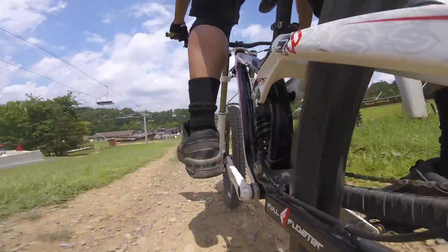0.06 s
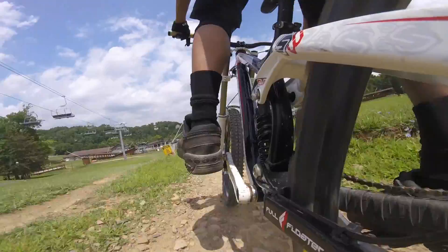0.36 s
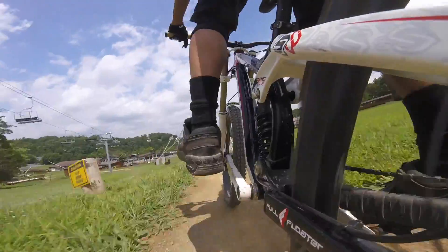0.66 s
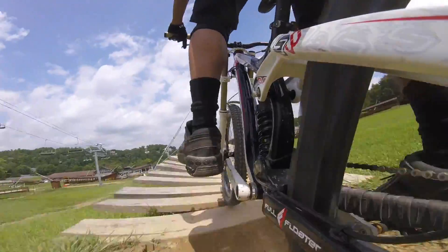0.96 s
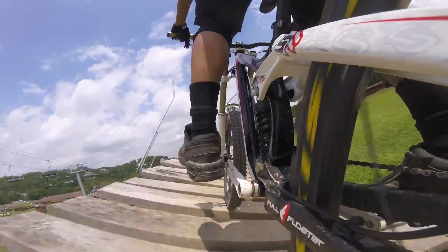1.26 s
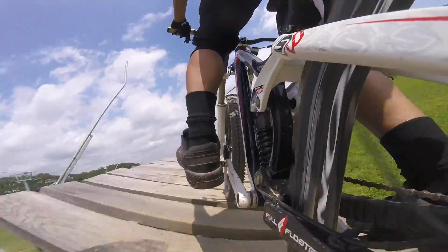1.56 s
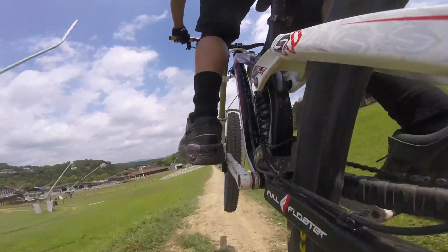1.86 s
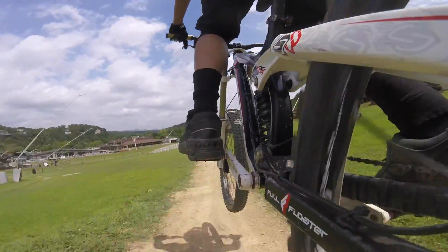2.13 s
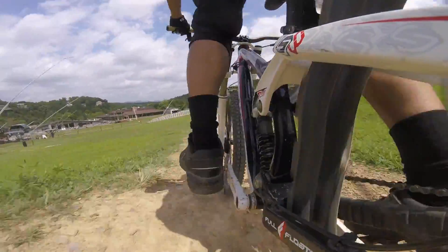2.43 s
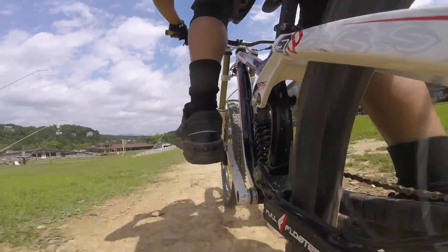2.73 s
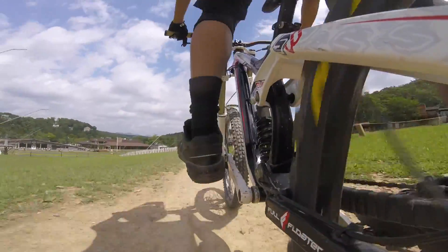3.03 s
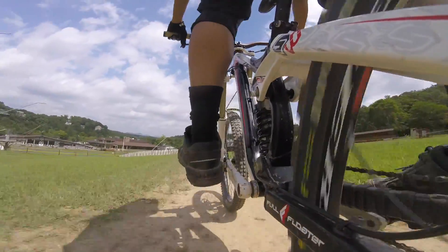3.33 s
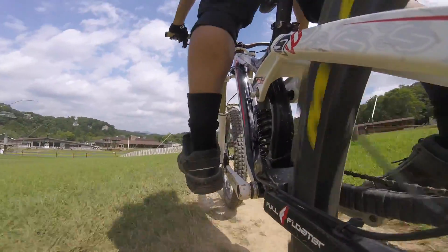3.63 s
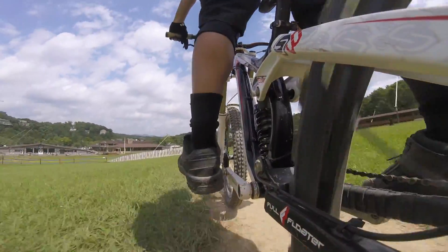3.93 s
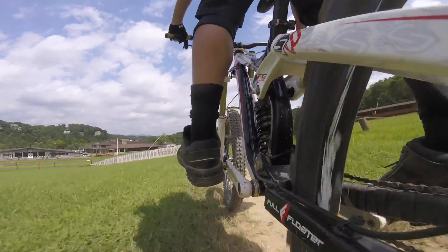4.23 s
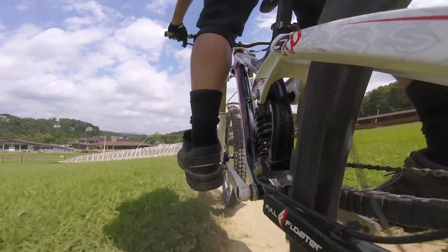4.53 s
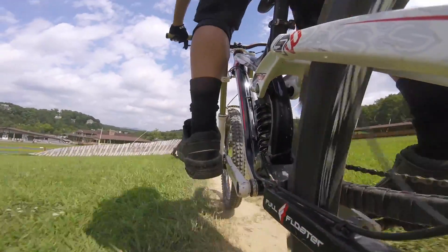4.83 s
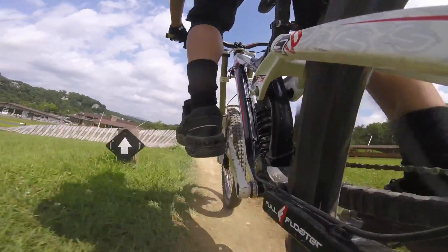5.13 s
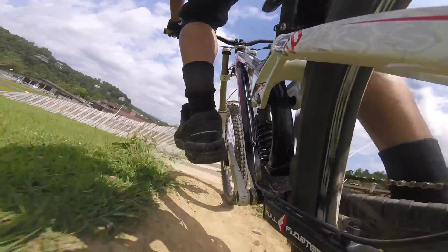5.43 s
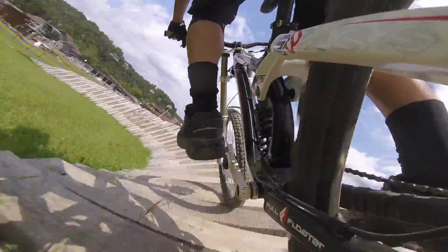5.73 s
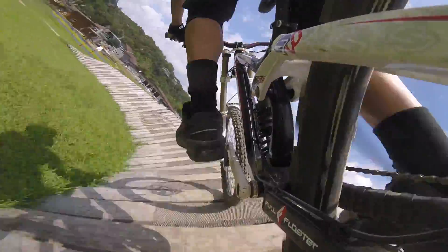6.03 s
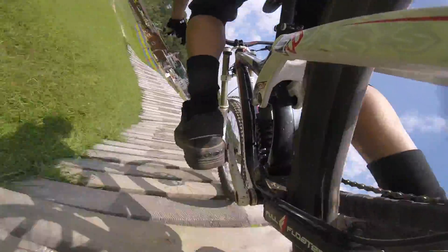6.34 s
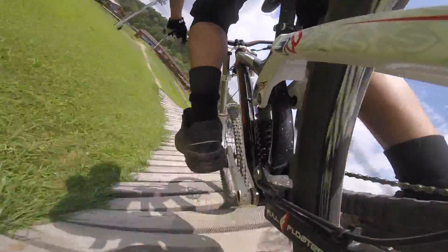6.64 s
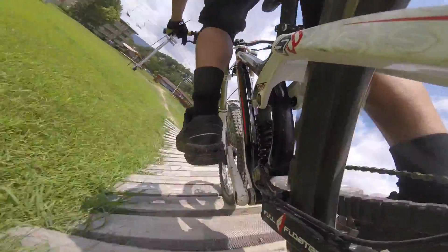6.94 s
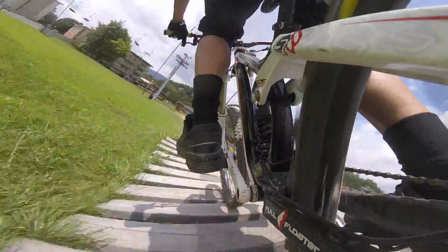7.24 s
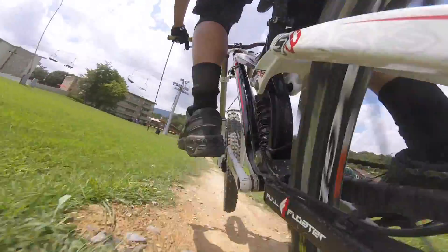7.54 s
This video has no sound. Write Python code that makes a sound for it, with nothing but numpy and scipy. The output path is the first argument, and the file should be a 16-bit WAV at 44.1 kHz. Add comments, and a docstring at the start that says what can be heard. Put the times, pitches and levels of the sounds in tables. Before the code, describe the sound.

A mountain bike coasts downhill, hub buzzing and chain slapping over dirt, lands a jump, then drums across wooden planks in wind.

```python
"""Mountain bike coasting downhill

Heard from a camera clamped to the frame. The freehub buzzes, tyres scrub and crunch on dirt,
and bumps boom the frame and set the chain slapping. The tyres go quiet in a short jump and land
with a thud. Later wind buffets the microphone and wooden planks drum under the wheels."""
import sys
import numpy as np
from scipy import signal
from scipy.fft import rfft, irfft
from scipy.io import wavfile
from scipy.ndimage import uniform_filter1d

SR = 44100
rng = np.random.default_rng(int(sys.argv[2]) if len(sys.argv) > 2 else 0)


def store_wav(level_fs):
    """Save 16-bit WAV to argv[1]."""
    pcm = np.round(np.clip(np.atleast_2d(level_fs), -1, 1) * 32767)
    wavfile.write(sys.argv[1], SR, pcm.T.astype(np.int16))


N = 343539
T = np.arange(N) / SR

LIFT_S, FRONT_DOWN_S, REAR_DOWN_S = 1.706, 2.13, 2.42  # the jump

# Ratchet rate while coasting: time_s, teeth_per_s
RATCHET_RATE = [(0, 108), (.35, 116), (.9, 110), (1.15, 88), (1.95, 89), (2.15, 100), (2.38, 89), (2.9, 98),
                (3.55, 92), (3.75, 103), (4.2, 109), (6.6, 105), (7.1, 94), (7.79, 92)]
# Freehub levels: time_s, click_db, shell_db
HUB_LEVELS = [(0, -58.5, -57), (.63, -53.5, -54.5), (1, -56, -56.5), (1.85, -55.5, -55), (2.3, -52, -52.5),
              (2.85, -56.5, -54), (3.3, -58.5, -60), (3.6, -55, -55), (4.2, -51, -53), (4.55, -56.5, -56.5),
              (4.8, -57.5, -80), (6, -75, -84), (6.45, -65, -75), (6.9, -62, -59), (7.79, -61, -59)]
# Ground contact: time_s, roar_db, grit_db
TYRE_LEVELS = [(0, -34, -44.5), (.4, -32, -43.5), (.8, -33.5, -48.5), (1.19, -33.5, -41.5),
               (1.38, -39.5, -49.5), (1.65, -35, -44), (2.15, -35.5, -50), (2.31, -29, -43),
               (2.395, -35, -43.5), (2.45, -32.5, -46), (2.55, -38.5, -44), (2.64, -30, -44.5),
               (2.95, -34, -48), (3.12, -33, -44.5), (3.4, -34, -44.5), (3.7, -30, -48),
               (3.97, -36.5, -45.5), (4.4, -34.5, -45), (6.55, -39.5, -48.5), (7.2, -36.5, -46.5),
               (7.45, -32.5, -43), (7.7, -35.5, -48), (7.765, -31, -43.5)]
# Rumble of sway and headwind: time_s, level_db
SWAY_LEVELS = [(0, -33), (.26, -24.5), (.55, -24), (.8, -35), (1.15, -23.5), (1.4, -33), (1.63, -18.5),
               (2.03, -48.5), (2.3, -28), (2.39, -36), (2.45, -23.5), (2.85, -28.5), (3.15, -25),
               (3.95, -32.5), (4.7, -25), (5.45, -22.5), (6.1, -24), (6.78, -30), (7.55, -22.5),
               (7.79, -31)]
# Hard chain slaps on the frame: start_s, rise_s, clash_db, knock_db, sparkle_db
SLAPS = [(0.156, 0.0044, -38.5, -42, -64.5), (0.237, 0.0019, -32, -27.5, -45.5),
         (0.295, 0.0051, -42, -28, -62), (0.3148, 0.0026, -28, -44, -59),
         (0.376, 0.0019, -33.5, -23.5, -43.5), (0.4259, 0.0035, -26, -26, -41.5),
         (0.486, 0.002, -29, -34, -46), (0.5164, 0.0012, -22.5, -28, -36),
         (0.6098, 0.0012, -22.5, -30, -51), (1.05, 0.0014, -28.5, -51, -60),
         (1.0976, 0.0014, -31, -38, -47), (1.123, 0.0012, -25.5, -48, -48.5),
         (1.1452, 0.0017, -28, -38, -41), (1.1563, 0.0019, -22, -19.5, -42),
         (1.1918, 0.00073, -17.5, -22, -34), (1.2207, 0.0023, -26, -29, -49),
         (1.2446, 0.0011, -24.5, -28, -40), (1.2589, 0.0024, -30, -26.5, -50),
         (1.379, 0.0028, -29.5, -32, -50), (1.4025, 0.001, -30, -26, -58), (1.493, 0.0013, -21, -23.5, -38),
         (1.5087, 0.0028, -27.5, -28, -43), (1.5428, 0.0011, -24, -24.5, -48),
         (1.5598, 0.0022, -24.5, -31, -40), (1.5893, 0.0013, -25.5, -30, -43),
         (1.607, 0.0017, -32, -35, -48), (1.644, 0.0013, -26.5, -31, -60), (1.6874, 0.0008, -33, -36, -49),
         (1.7, 0.0019, -24.5, -25, -60), (1.8054, 0.0017, -25.5, -29.5, -44.5),
         (2.4383, 0.0027, -22.5, -23, -41), (2.449, 0.0042, -29, -20.5, -52),
         (2.4584, 0.0013, -19, -21, -34), (2.4717, 0.005, -31, -29, -51), (2.4799, 0.0029, -23, -20, -41),
         (2.514, 0.0011, -26, -30, -47), (2.603, 0.0012, -28, -31, -51), (2.6211, 0.0014, -23.5, -34, -41),
         (2.6312, 0.0008, -42, -24, -60), (2.7421, 0.0011, -28.5, -24.5, -53),
         (2.756, 0.0025, -33, -32, -56), (2.7745, 0.0016, -20.5, -23.5, -41),
         (2.8959, 0.0025, -24, -24, -42), (2.9369, 0.0029, -28, -30, -45), (3.0379, 0.0013, -26, -30, -49),
         (3.0764, 0.0017, -23, -23, -53), (3.089, 0.0014, -20, -18.5, -50), (3.1103, 0.0023, -19, -16, -46),
         (3.1324, 0.003, -25, -24.5, -44), (3.1584, 0.0019, -27, -28, -49),
         (3.184, 0.0014, -29.5, -33, -55), (3.2338, 0.0012, -33, -32, -49),
         (3.4106, 0.0017, -29.5, -24, -60), (3.4332, 0.0028, -22.5, -28.5, -59),
         (3.596, 0.00078, -26.5, -28, -54), (3.6125, 0.0015, -28, -32, -58),
         (3.6484, 0.0041, -29.5, -23.5, -47), (3.6702, 0.0013, -21.5, -24.5, -54),
         (3.6935, 0.001, -21.5, -21.5, -51), (4.1284, 0.0015, -30, -36, -61),
         (4.2122, 0.0029, -22, -26, -47), (4.2391, 0.0018, -19.5, -17.5, -47),
         (4.287, 0.0021, -26, -32, -41), (4.428, 0.0007, -45, -38, -55), (4.6556, 0.0009, -36, -27.5, -46),
         (4.6784, 0.003, -37, -32, -56), (4.762, 0.0005, -38, -25.5, -69), (4.946, 0.0015, -33.5, -25, -45),
         (5.155, 0.0026, -34, -25, -59), (5.1774, 0.0024, -35, -42, -47), (5.1964, 0.0022, -35, -30, -53),
         (5.22, 0.0035, -34, -31, -52), (5.3108, 0.0022, -38, -28, -52), (5.324, 0.0009, -30.5, -34, -52),
         (5.3442, 0.0014, -29.5, -22, -49), (5.397, 0.0012, -37, -31, -50), (5.404, 0.0026, -35, -29, -48),
         (5.433, 0.0019, -34, -24, -51), (5.495, 0.0013, -35.5, -30, -48.5),
         (5.6274, 0.0024, -35.5, -34, -49), (5.7114, 0.0015, -29.5, -23.5, -45),
         (5.7433, 0.00062, -46, -26, -73), (5.8397, 0.0014, -34, -37, -50), (5.8672, 0.0013, -38, -27, -51),
         (5.886, 0.0022, -34.5, -34, -52), (5.9308, 0.0017, -30, -37, -57), (5.964, 0.0024, -38, -34, -53),
         (6.093, 0.0019, -31.5, -31, -52), (6.125, 0.0017, -34, -36, -47), (6.144, 0.0035, -38, -31, -54),
         (6.171, 0.0024, -35, -35, -50), (6.1918, 0.0008, -38, -40, -54), (6.2058, 0.0017, -37, -34, -51),
         (6.2374, 0.0026, -34.5, -28.5, -51), (6.3057, 0.0012, -37, -36, -57),
         (6.3295, 0.0017, -38, -41, -53), (6.3896, 0.0035, -39, -38, -65),
         (6.4344, 0.00099, -37.5, -47, -62), (6.4922, 0.0014, -37, -39, -58),
         (6.5236, 0.0019, -44, -45, -58), (6.541, 0.0015, -30, -32, -54),
         (6.5962, 0.0011, -28, -27.5, -42.5), (6.6144, 0.0009, -41, -37, -58),
         (6.6857, 0.0012, -36, -33, -67), (6.732, 0.0013, -35, -45, -53), (6.749, 0.002, -34, -31, -63),
         (6.857, 0.0017, -32, -24, -47), (6.8708, 0.0015, -31, -35, -47), (6.8916, 0.0015, -32, -40, -54),
         (6.9198, 0.0012, -34, -41, -49), (6.9324, 0.0014, -34, -40, -52), (6.948, 0.0012, -35, -35, -53),
         (6.9956, 0.0013, -38, -29.5, -51), (7.0227, 0.0011, -33, -32, -43),
         (7.0423, 0.0021, -35.5, -29, -50), (7.115, 0.0014, -28, -31.5, -48),
         (7.1369, 0.0012, -37, -41, -49), (7.2517, 0.0024, -38.5, -39, -58),
         (7.3648, 0.0011, -34, -35, -54), (7.386, 0.0013, -30.5, -34, -48), (7.465, 0.0014, -34, -39, -57),
         (7.4982, 0.0015, -27, -26, -59)]
# Trail bumps: start_s, length_s, boom_db, rattle_db
BUMPS = [(0.277, 0.088, -15, -47), (0.474, 0.0905, -17, -32), (0.571, 0.062, -13, -42),
         (1.03, 0.15, -24, -36.5), (1.247, 0.072, -15, -66), (1.534, 0.14, -17, -38),
         (2.413, 0.068, -19, -28), (2.488, 0.058, -14, -55), (2.586, 0.069, -13, -48),
         (2.773, 0.24, -20.5, -58), (3.078, 0.045, -21.5, -40), (3.172, 0.12, -22.5, -51),
         (3.421, 0.04, -19, -30.5), (3.58, 0.17, -21.5, -44), (3.776, 0.39, -22.5, -65),
         (4.234, 0.24, -17, -57), (4.551, 0.082, -21.5, -55), (4.69, 0.039, -22, -57),
         (5.114, 0.038, -22.5, -34), (5.321, 0.13, -19.5, -41.5), (5.573, .07, -20, -54),
         (6.019, 0.065, -19, -55), (6.471, 0.071, -22.5, -55), (6.844, 0.095, -19, -49),
         (7.01, 0.17, -20, -56), (7.365, 0.26, -24, -49)]
# Heavy wheel blows, the landing hardest: start_s, level_db
WHEEL_BLOWS = [(0.902, -17.5), (1.135, -11.5), (1.287, -23), (2.424, -10), (2.44, -23), (2.499, -18),
               (2.606, -12.5), (2.63, -23), (2.795, -18), (3.088, -16), (3.124, -18), (3.634, -22),
               (4.4, -21)]
# Turbulence at the microphone: time_s, roar_db, flutter_db
GUST = [(4.33, -29.5, -51), (4.66, -26.5, -47), (4.85, -30, -50), (5.17, -30, -34.5), (5.6, -27, -41.5),
        (5.8, -34.5, -41.5), (6.1, -31, -41), (6.3, -35.5, -43.5), (6.45, -49, -50)]
# Strongest eddies: time_s, crack_db, thud_db
BUFFETS = [(4.484, -27, -17.5), (4.53, -31, -25.5), (4.545, -29.5, -25), (4.571, -27, -22.5),
           (4.591, -21, -26), (4.6, -35, -32), (4.626, -30, -25), (4.657, -29, -16), (4.669, -26, -20),
           (4.721, -32, -30), (4.731, -29, -30), (4.741, -27, -18.5), (4.764, -29, -34),
           (4.811, -35, -28.5), (4.88, -23, -18), (4.896, -31, -21), (4.945, -29, -14.5),
           (4.989, -37, -23.5), (4.997, -26.5, -22), (5.067, -16.5, -19), (5.078, -19.5, -19),
           (5.106, -28, -30), (5.147, -35, -21.5), (5.159, -26, -16.5), (5.198, -35, -18.5),
           (5.211, -26, -29), (5.219, -24, -22), (5.228, -35, -19), (5.264, -34, -26), (5.311, -31, -23.5),
           (5.336, -19, -17), (5.347, -34, -23), (5.353, -34, -19), (5.411, -29, -21.5), (5.438, -30, -24),
           (5.488, -30, -39), (5.527, -30, -21.5), (5.591, -39, -28), (5.633, -22.5, -17.5),
           (5.714, -24, -19), (5.842, -31, -23), (5.894, -28, -18), (5.931, -29, -20.5),
           (6.068, -31, -27.5), (6.096, -32, -21), (6.118, -39, -29), (6.153, -33, -23.5)]
# Boardwalk: time_s, planks_per_s, level_db
PLANKS = [(5.55, 34.3, -20), (6.06, 40, -23), (6.4, 37, -24.5), (6.75, 43, -44), (6.9, 40, -32.5),
          (7.03, 46, -42), (7.18, 38, -30), (7.3, 52, -37), (7.7, 30, -44)]

# Spectra of pawls, tyres and sway: freq_hz, density_db
PAWL_SPECTRUM = [(600, -44.5), (1300, -9), (2300, -2.5), (3000, -1), (3550, -9), (4300, -4), (5200, -5),
                 (5750, -8.5), (6400, -19.5), (6900, -32.5), (8600, -19.5), (9450, -43), (11800, -35),
                 (14000, -62)]
CARCASS_SPECTRUM = [(40, -31.5), (75, 0), (100, 3), (140, 1), (200, -1.5), (300, -5.5), (450, -15),
                    (700, -29.5), (1200, -42.5), (3000, -62), (10000, -103)]
GRIT_SPECTRUM = [(200, -18), (500, 10), (800, 3), (1200, -2.5), (1700, -6.5), (2600, -8), (4000, -18.5),
                 (6000, -19), (7000, -28), (9500, -30.5), (14000, -87)]
SWAY_SPECTRUM = [(4, 1.5), (14, -12), (25, 1.5), (38, 3.5), (50, 1.5), (75, -12), (120, -15), (300, -81),
                 (1500, -100)]
# Spectra of chain on frame: freq_hz, density_db
CLASH_SPECTRUM = [(400, -41), (900, 7), (1500, 13), (2300, 11.5), (3000, 5.5), (3600, 4), (4400, 1),
                  (5300, 3.5), (6100, -6), (7200, -12), (8200, -6.5), (9500, -15.5), (12000, -30.5),
                  (14000, -60)]
KNOCK_SPECTRUM = [(60, -21.5), (200, 14.5), (400, -2.5), (600, 3), (850, -4), (1300, 0), (1800, 0),
                  (2600, -7), (5000, -45), (12000, -78.5)]
SPARKLE_SPECTRUM = [(2500, -70.5), (5800, -16.5), (6700, -6.5), (7800, -2), (8700, -10), (10500, -23),
                    (11700, -24), (14000, -55)]
# Spectra of wind on the microphone and a faint high hiss: freq_hz, density_db
ROAR_SPECTRUM = [(30, -16.5), (85, 9.5), (150, 3), (300, -2.5), (520, -13.5), (750, -18.5), (1100, -24),
                 (2000, -39), (5000, -65), (12000, -100)]
FLUTTER_SPECTRUM = [(150, -37), (350, 5), (560, 5), (850, -9.5), (1400, -10.5), (2200, -17), (3300, -23),
                    (5000, -31.5), (9000, -46), (14000, -66)]
THUD_SPECTRUM = [(30, -44), (120, 3.5), (350, 7), (600, 3.5), (900, -6.5), (1600, -37.5), (4000, -79),
                 (12000, -101)]
CRACK_SPECTRUM = [(200, -6.5), (520, 7.5), (800, 7.5), (1300, 0), (2100, -8), (3200, -20.5), (4500, -27),
                  (9000, -43), (14000, -87)]
HISS_SPECTRUM = [(2500, -26), (4800, -2), (5700, -12), (6400, 8), (7300, -15), (8200, -1), (9500, -26),
                 (11000, -6.5), (14000, -31)]

# Hub and frame resonances: centre_hz, width_hz, boost_db
HUB_PEAKS = [(3700, 200, 4.4), (3890, 250, 5), (4640, 160, 2.6), (5900, 150, 4.1), (7250, 200, 8.2),
             (8000, 250, 11), (9800, 230, 4.1), (10800, 150, 18)]
FRAME_PEAKS = [(1880, 150, 4), (3280, 70, 11), (4000, 300, 3), (4670, 160, 8), (5050, 160, 5),
               (6020, 100, 5), (7050, 400, 5), (7950, 200, 4), (11950, 360, 11.5)]
# Ringing of hub shell, suspension and plank: pitch_hz, width_hz, level_db
SHELL_MODES = [(1905, 70, 3.5), (1995, 45, 6), (2230, 70, -10), (2725, 50, -10), (3265, 40, 1),
               (4005, 60, -10), (4535, 45, -5), (4870, 60, -9), (5100, 60, -9), (6010, 38, -6),
               (8850, 110, -18)]
SUSPENSION_MODES = [(61.4, 14, 3), (149, 68, -3), (220, 95, 3.5), (410, 89, -5.5)]
PLANK_MODES = [(330, 64, 1), (459, 96, 7), (590, 210, -26), (700, 14, -10)]


def amp(db):
    """Decibels to gain."""
    return np.exp(np.asarray(db) * (np.log(10) / 20))


def unit(x):
    """Scale to unit rms."""
    return x / np.sqrt(np.mean(x ** 2) + 1e-20)


def peaked(x, size=176):
    """Scale the loudest few milliseconds to unit rms."""
    return x / np.sqrt(uniform_filter1d(x ** 2, size).max() + 1e-20)


def steadied(x, window_s):
    """Even out slow swells; unit rms."""
    power = signal.fftconvolve(x ** 2, np.hanning(int(window_s * SR)), "same")
    return unit(x / np.sqrt(abs(power) + 1e-12))


def curve(rows, column=1):
    """Table column interpolated at every sample."""
    rows = np.asarray(rows)
    return np.interp(T, rows[:, 0], rows[:, column])


def during(rows, fade_s=0.089):
    """Faded gate over a table's time span."""
    return np.clip(np.minimum(T - rows[0][0], rows[-1][0] - T) / fade_s, 0, 1)


def wander(cutoff_hz, size=8192):
    """Smooth random drift, unit rms."""
    freq_hz = np.fft.rfftfreq(size, T[-1] / size)
    slow = irfft(rfft(rng.standard_normal(size)) * np.exp(-(freq_hz / cutoff_hz) ** 2))
    return np.interp(T, np.linspace(0, T[-1], size), unit(slow))


def ticks(count):
    """One impulse as a count passes each whole number."""
    return np.diff(np.floor(count), prepend=0).clip(0, 1)


def swell(t, peak_s):
    """Rise to one at peak_s, then decay."""
    return t / peak_s * np.exp(1 - t / peak_s)


def ringing(modes, t):
    """Decaying tones of a struck object."""
    return sum(amp(db) * np.exp(-np.pi * width_hz * t) * np.sin(2 * np.pi * hz * t)
               for hz, width_hz, db in modes)


def colour(spectrum, peaks=(), size=4096):
    """Minimum-phase impulse response of a broad spectrum plus resonances."""
    freq_hz = np.fft.rfftfreq(size, 1 / SR)
    hz, db = np.transpose(spectrum)
    db = np.interp(np.log(freq_hz + 1), np.log(hz + 1), db)
    for centre_hz, width_hz, boost_db in peaks:
        detune = 2 * (freq_hz - centre_hz) / width_hz
        db = db + 10 * np.log10(1 + (amp(boost_db) ** 2 - 1) / (1 + detune ** 2))
    cepstrum = irfft(np.log(amp(np.maximum(db, -100))))
    cepstrum[1:size // 2] *= 2
    cepstrum[size // 2 + 1:] = 0
    return irfft(np.exp(rfft(cepstrum)))


def through(x, response):
    """Convolve, keeping the length."""
    return signal.oaconvolve(x, response)[:len(x)]


def tinted(x, response):
    """Filter at unit gain for white noise."""
    return through(x, response / np.linalg.norm(response))


def add(mix, start_s, sound):
    """Mix a sound in at start_s."""
    part = mix[max(round(start_s * SR), 0):][:len(sound)]
    part += sound[:len(part)]


def airborne(down_s, lift_fade_s=0.2, land_fade_s=0.063):
    """Faded gate from take-off to touchdown."""
    return np.clip(np.minimum((T - LIFT_S) / lift_fade_s, (down_s - T) / land_fade_s), 0, 1)


def jolts(column, rise_s=0.024, fall_s=0.032):
    """Bump envelope: rise, hold, decay, at the levels of one BUMPS column."""
    out, t = np.zeros(N), T[:SR]
    for row in BUMPS:
        start_s, length_s = row[:2]
        decay = np.exp(-np.maximum(t - length_s, 0) / fall_s)
        add(out, start_s, amp(row[column]) * np.minimum(t / rise_s, 1) * decay)
    return out


def swinging(flight_s=0.017):
    """One while the chain is off the frame, swinging toward a hard slap."""
    off = np.zeros(N)
    for start_s, *_ in SLAPS:
        add(off, start_s - flight_s, np.ones(int(flight_s * SR)))
    return off.clip(0, 1)


def freehub(click_db=-3, lag_teeth=0.13, hush_at_s=2.392, hush_width_s=0.014, hush_db=-15):
    """Two pawls drop into each tooth just apart, chatter and ring the hub shell."""
    t = T[:4000]
    teeth = np.cumsum(curve(RATCHET_RATE)) / SR + 0.04 * wander(50)
    second_pawl = ticks(teeth - lag_teeth * (1 + 0.53 * wander(40)))
    drops = (ticks(teeth) + amp(-3) * second_pawl) * amp(1.5 * wander(74))
    chatter = through(drops, swell(t, peak_s=0.0013)) * rng.standard_normal(N)
    clicks = through(drops + amp(-6) * chatter, colour(PAWL_SPECTRUM, HUB_PEAKS))
    clicks = amp(curve(HUB_LEVELS) + click_db) * steadied(clicks, window_s=0.4)
    strikes = drops + amp(-30) * chatter
    # Two sets of modes trade strength as the hub turns.
    shell = sum(amp(2 * wander(5)) * through(strikes, ringing(modes, t))
                for modes in (SHELL_MODES[::2], SHELL_MODES[1::2]))
    shell = amp(curve(HUB_LEVELS, column=2)) * steadied(shell, window_s=0.08)
    touchdown_dip = amp(hush_db * np.exp(-((T - hush_at_s) / hush_width_s) ** 2))
    return touchdown_dip * (clicks + shell)


def tyres(grit_db=-1, stones_per_s=500, air_roar_db=-11, air_grit_db=-16, in_gust_db=-5, bump_db=3):
    """Knobs drum the carcass; sand and stones crunch under the tread and faintly ring the frame."""
    lumps = amp(1.5 * wander(87))
    roar = steadied(through(rng.standard_normal(N) * lumps, colour(CARCASS_SPECTRUM)), window_s=0.061)
    sizes = amp(1.5 * np.minimum(rng.exponential(1, N), 5)) * rng.choice([-1, 1], N)
    stones = unit(sizes * (rng.random(N) < stones_per_s / SR))
    sand = rng.standard_normal(N)
    faint_peaks = [(hz, width_hz, 0.1 * db) for hz, width_hz, db in FRAME_PEAKS]
    grit = unit(through((sand + amp(-2) * stones) * lumps, colour(GRIT_SPECTRUM, faint_peaks)))
    in_air = airborne(FRONT_DOWN_S)
    roar *= amp(curve(TYRE_LEVELS) + air_roar_db * in_air)
    grit *= amp(curve(TYRE_LEVELS, column=2) + grit_db + air_grit_db * in_air)
    bumps = jolts(column=2)
    ruts_db = 2 * wander(23)
    return (roar + grit) * amp(in_gust_db * during(GUST) + ruts_db + bump_db * bumps / bumps.max())


def frame_boom(unloaded_hz=65.32, sag=0.06954, boom_db=-4, rolling_db=-29.5, air_db=-5, planks_db=-7):
    """Frame and mount throb at one low mode over a deep sway; bumps drive it harder and lower."""
    bumps = jolts(column=2)
    pitch_hz = unloaded_hz * (1 - sag * bumps / bumps.max())
    cycles = np.cumsum(pitch_hz) / SR + 0.16 * wander(13.5)
    throb = wander(25.5).clip(-3, 1)
    duck_db = air_db * airborne(REAR_DOWN_S) + planks_db * during(PLANKS)
    rolling_drive = amp(rolling_db + duck_db + 4.5 * throb)
    bump_drive = amp(boom_db + throb) * bumps
    boom = np.hypot(rolling_drive, bump_drive) * unit(np.sin(2 * np.pi * cycles))
    sway = steadied(through(rng.standard_normal(N), colour(SWAY_SPECTRUM, size=16384)), window_s=0.077)
    lurch_db = 2.5 * wander(4.2)
    return boom + amp(curve(SWAY_LEVELS) + lurch_db) * sway


def chain_slaps(link_spread_db=4, tail_s=0.005, rebound_s=0.0008, knock_fall_s=0.0034, size=4000):
    """A run of links lands on the frame and rebounds: metallic clash over a dull knock."""
    out, t = np.zeros(N), T[:size]
    dull, bright = colour(KNOCK_SPECTRUM), colour(SPARKLE_SPECTRUM)
    for start_s, rise_s, clash_db, knock_db, sparkle_db in SLAPS:
        links = rng.standard_normal(size) * amp(link_spread_db * rng.standard_normal(size))
        links *= rng.random(size) < 0.4
        # The spot struck sets how much each frame mode rings.
        peaks = [(hz * rng.uniform(0.98, 1.02), width_hz, db + 4 * rng.uniform(-1, 1))
                 for hz, width_hz, db in FRAME_PEAKS]
        metal = colour(CLASH_SPECTRUM, peaks)
        rebound = amp(-13) * np.exp(-((t - rng.uniform(0.003, 0.012)) / rebound_s) ** 2)
        landing = links * (swell(t, rise_s) + amp(-21) * np.exp(-t / tail_s) + rebound)
        push = links * np.minimum(t / rise_s, 1) * np.exp(-t / knock_fall_s)
        add(out, start_s, amp(clash_db - 8) * peaked(through(landing, metal)))
        add(out, start_s, amp(knock_db - 6) * peaked(through(push, dull)))
        add(out, start_s, amp(sparkle_db - 4) * peaked(through(landing, bright)))
    return out


def carcass_thumps(gain_db=-6, rise_s=0.0031, fall_s=0.011, size=5000):
    """The jolt behind each hard slap kicks a deep thump from the tyre carcass."""
    out, t = np.zeros(N), T[:size]
    carcass = colour(CARCASS_SPECTRUM)
    for start_s, _, _, knock_db, _ in SLAPS:
        kick = rng.standard_normal(size) * (1 - np.exp(-t / rise_s)) * np.exp(-t / fall_s)
        add(out, start_s, amp(knock_db + gain_db) * peaked(through(kick, carcass)))
    return out


def slack_links(gain_db=-18, touches_per_s=900, spread_db=6, settle_s=0.012):
    """Slack links jingle against each other after each slap."""
    motion, t = np.zeros(N), T[:8000]
    for start_s, _, clash_db, *_ in SLAPS:
        add(motion, start_s, amp(clash_db) * np.exp(-t / settle_s))
    touches = rng.standard_normal(N) * amp(spread_db * rng.standard_normal(N))
    touches *= rng.random(N) < touches_per_s / SR
    return amp(gain_db) * motion * unit(through(touches, colour(CLASH_SPECTRUM, FRAME_PEAKS)))


def chain_rattle(bounce_hz=44, planks_db=-49, link_spread_db=4, rise_s=0.0014, fall_s=0.0026):
    """Over bumps and planks the chain bounces on the frame in light, uneven slaps."""
    t = T[:2000]
    bounces = ticks(np.cumsum(np.full(N, bounce_hz / SR)) + 0.28 * wander(25))
    force = np.hypot(jolts(column=3), amp(planks_db) * during(PLANKS))
    force *= amp(4 * wander(70).clip(-2.5, 1.5))
    contact = (1 - np.exp(-t / rise_s)) * np.exp(-t / fall_s)
    envelope = through(bounces * force * (1 - swinging()), contact)
    links = rng.standard_normal(N) * amp(link_spread_db * rng.standard_normal(N))
    landing = envelope * unit(links * (rng.random(N) < 0.4))
    clash = amp(2) * tinted(landing, colour(CLASH_SPECTRUM, FRAME_PEAKS))
    knock = amp(5) * tinted(landing, colour(KNOCK_SPECTRUM))
    sparkle = amp(-9) * tinted(landing, colour(SPARKLE_SPECTRUM))
    return clash + knock + sparkle


def wheel_blows(contact_s=0.0023):
    """A wheel slams down: a half-sine push sets suspension and frame thudding."""
    out, t = np.zeros(N), T[:9000]
    push = np.sin(np.pi * np.minimum(t / contact_s, 1))
    thud = peaked(through(push, ringing(SUSPENSION_MODES, t)))
    for start_s, level_db in WHEEL_BLOWS:
        add(out, start_s, amp(level_db) * thud)
    return out


def wind(roar_db=2, flutter_db=-1, crackles_per_s=2500, hiss_db=-67, hiss_fade_s=0.24):
    """Turbulence roars and crackles on the microphone; a faint high hiss lasts through the gust."""
    eddies = wander(65).clip(-2, 1.5)
    lulls = amp(2.2 * wander(29).clip(-2.5, 1))
    roar = through(rng.standard_normal(N) * amp(1.5 * eddies), colour(ROAR_SPECTRUM))
    roar = amp(curve(GUST) + roar_db) * steadied(roar, window_s=0.13)
    crackles = rng.standard_normal(N).clip(-2, 2) * (rng.random(N) < crackles_per_s / SR)
    flutter = through(crackles * amp(5.5 * eddies), colour(FLUTTER_SPECTRUM))
    flutter = amp(curve(GUST, column=2) + flutter_db) * steadied(flutter, window_s=0.063)
    hiss_envelope = np.clip((GUST[-1][0] - T) / hiss_fade_s, 0, 1) * amp(2 * wander(31))
    hiss_colour = colour(HISS_SPECTRUM, peaks=[(6300, 910, 4.1)])
    hiss = amp(hiss_db) * hiss_envelope * unit(through(rng.standard_normal(N), hiss_colour))
    return during(GUST) * (lulls * (roar + flutter) + hiss)


def buffets(swirl_gain=0.22, swirl_s=0.0035, lead_s=0.00074, size=3000):
    """An eddy hits the microphone port: a pressure impulse, then a short swirl."""
    out, t = np.zeros(N), T[:size]
    thud, crack = colour(THUD_SPECTRUM), colour(CRACK_SPECTRUM)
    for time_s, crack_db, thud_db in BUFFETS:
        impulse = (t == 0) * rng.choice([-1, 1])
        push = impulse + swirl_gain * rng.standard_normal(size) * np.exp(-t / swirl_s)
        add(out, time_s - lead_s, amp(thud_db - 1.5) * peaked(through(push, thud)))
        add(out, time_s - lead_s, amp(crack_db - 3) * peaked(through(push, crack)))
    return out


def boardwalk(gain_db=-1, octave_db=-13, knock_db=-17, knock_spread_db=7):
    """Planks shake the wheels at their passing rate; each knocks hollowly."""
    passed = np.cumsum(curve(PLANKS)) / SR + 0.0514 * wander(17.3)
    drum = unit(np.sin(2 * np.pi * passed) + amp(octave_db) * np.sin(4 * np.pi * passed))
    edges = ticks(passed) * amp(knock_spread_db * wander(40).clip(-2, 1.5))
    knocks = amp(knock_db) * unit(through(edges, ringing(PLANK_MODES, T[:3000])))
    return amp(curve(PLANKS, column=2) + gain_db) * during(PLANKS) * (drum + knocks)


def scene():
    """Mono sum at the microphone."""
    wheels = freehub() + tyres() + carcass_thumps() + wheel_blows()
    chain = chain_slaps() + chain_rattle() + slack_links()
    return (wheels + chain + frame_boom() + boardwalk() + wind() + buffets())[None]


def record(dry, ceiling=0.34, cutoff_hz=13300):
    """Camera: soft clip, then low-pass."""
    rounded = dry / (1 + (dry / ceiling) ** 4) ** (1 / 4)
    lowpass = signal.firwin(255, cutoff_hz, window=("kaiser", 9), fs=SR)
    return signal.oaconvolve(rounded, lowpass[None], "same")


dry = scene()
out = record(dry)
store_wav(out)
```